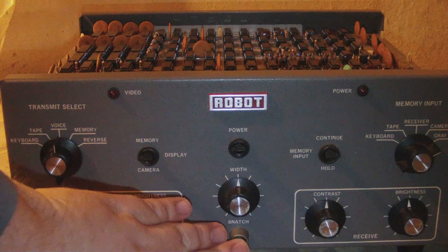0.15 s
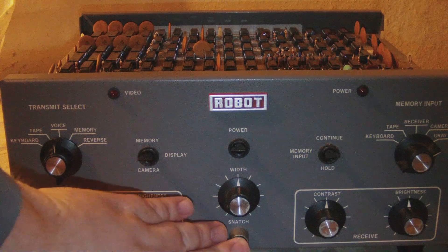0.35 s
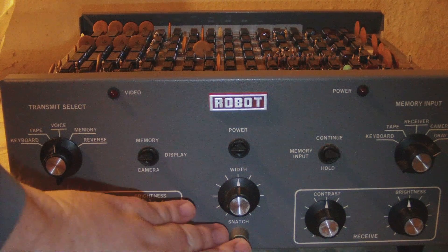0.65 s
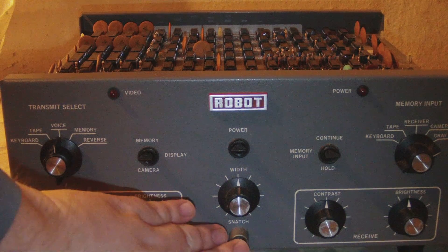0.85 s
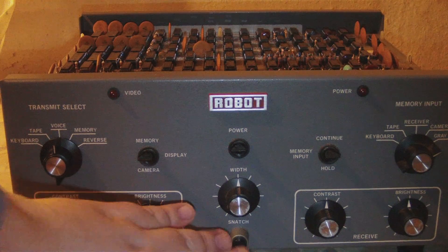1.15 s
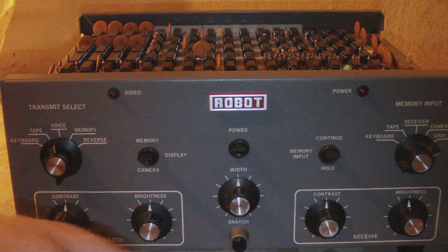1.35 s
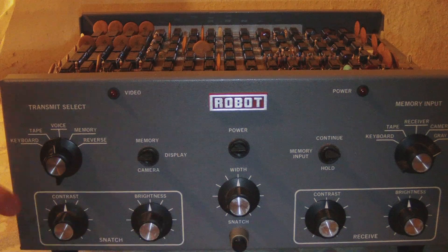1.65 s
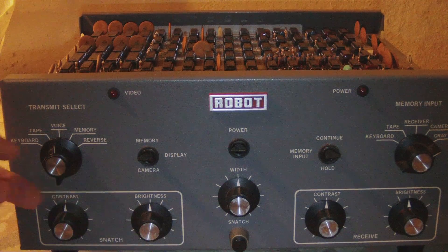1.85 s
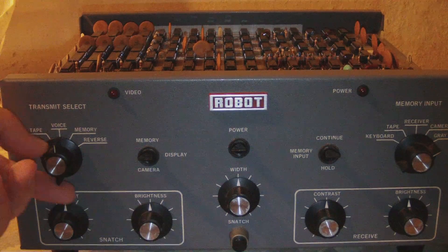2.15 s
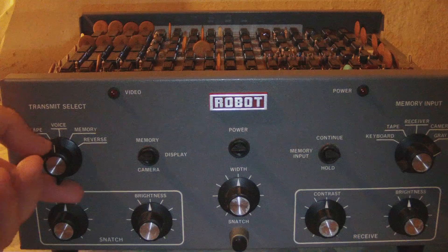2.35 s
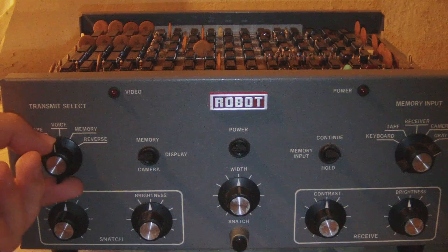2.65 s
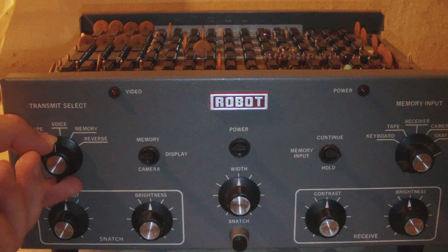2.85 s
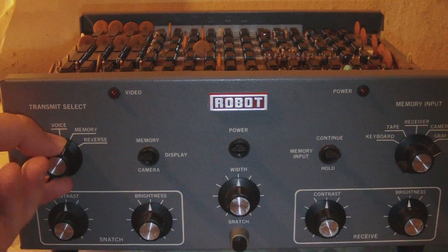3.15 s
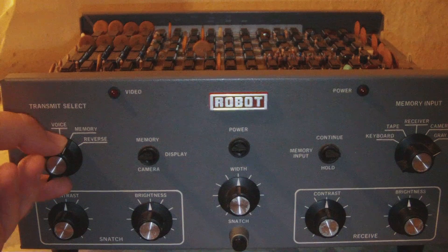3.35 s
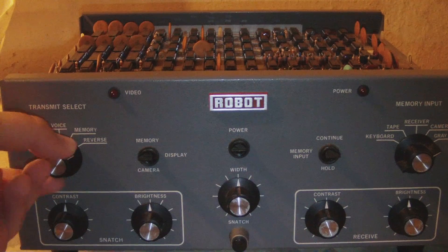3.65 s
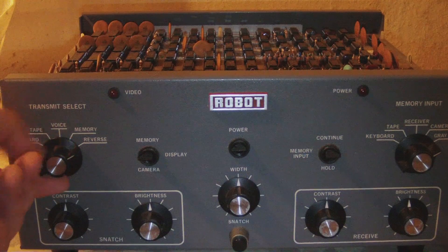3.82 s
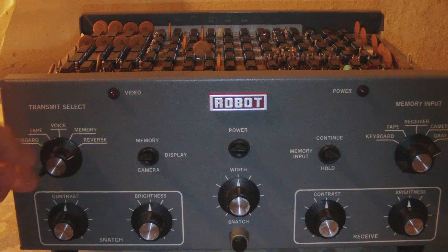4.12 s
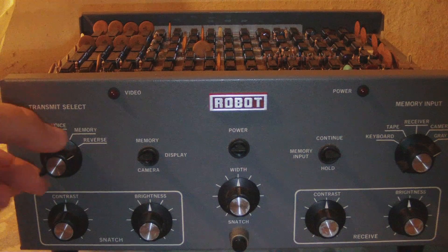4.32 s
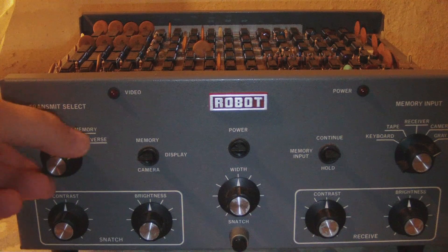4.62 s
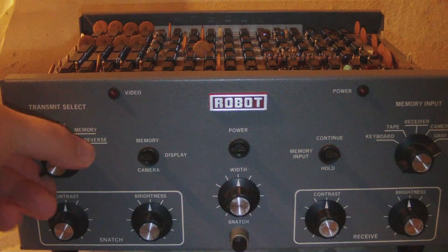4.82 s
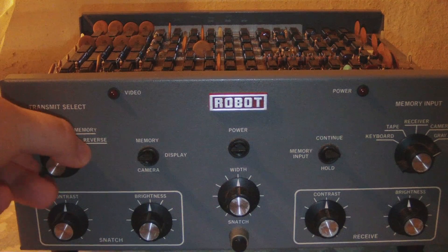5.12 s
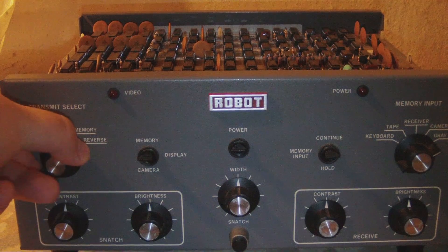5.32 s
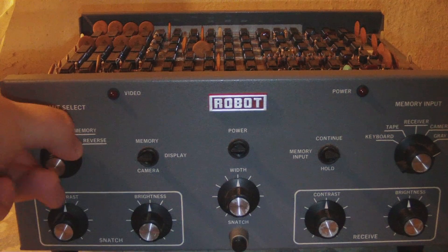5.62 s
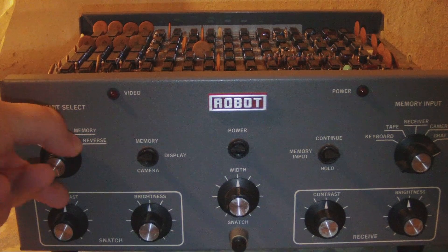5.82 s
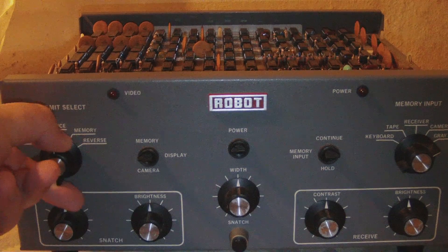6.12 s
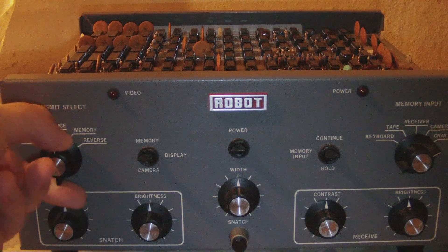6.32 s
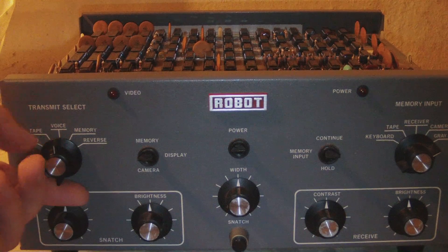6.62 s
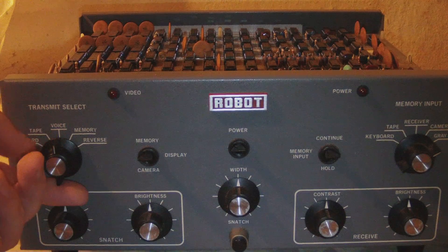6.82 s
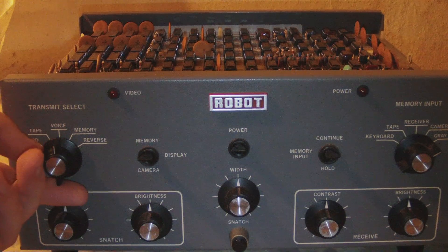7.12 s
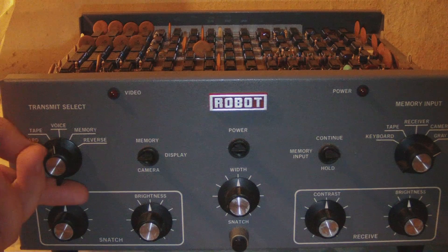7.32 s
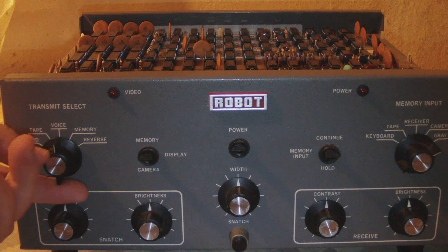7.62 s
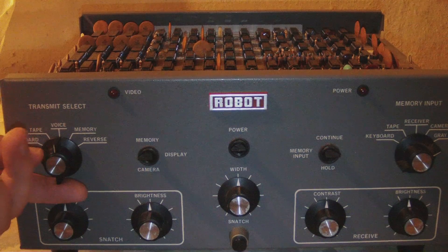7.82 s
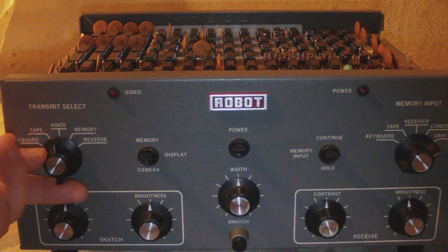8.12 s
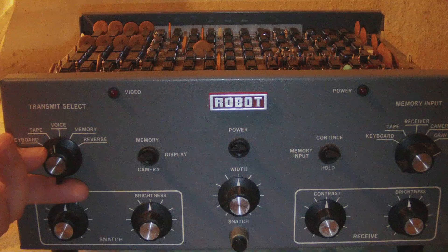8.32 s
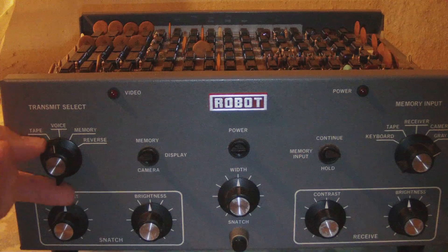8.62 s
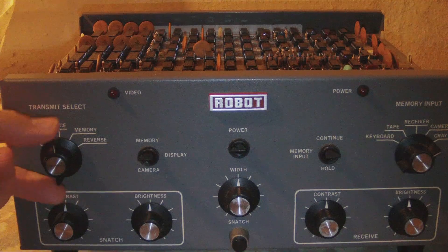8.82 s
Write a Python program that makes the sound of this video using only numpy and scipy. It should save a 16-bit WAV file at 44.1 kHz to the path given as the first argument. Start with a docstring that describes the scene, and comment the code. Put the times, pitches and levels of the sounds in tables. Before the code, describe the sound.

Fingers tick and brush lightly on a metal equipment panel, with one firmer tap. Then a rotary switch snaps twice in quick succession, sharp and metallic, with a brief ring. After a pause it clicks twice more, first softer, then loud. A few faint finger touches follow. A tiny lens motor ticks faintly around the first snap. The microphone is close, in a small quiet room with low rumble and hiss.

```python
"""Rotary selector on a metal panel

A hand works a rotary selector on a sheet-metal equipment panel, close by in a small quiet room.
Fingers tick and brush on the panel and knob. The detent snaps over, two steps up and later two
steps back, ringing the switch and the chassis. A small lens motor steps faintly beside the
microphone. Low rumble and microphone hiss lie underneath."""
import sys
import numpy as np
from scipy import signal
from scipy.fft import rfft, irfft
from scipy.io import wavfile

SR = 44100
rng = np.random.default_rng(int(sys.argv[2]) if len(sys.argv) > 2 else 0)


def inscribe(sig):
    """Save sig as 16-bit PCM at rate SR to the path in sys.argv[1].

    A 1-D sig is mono; a 2-D sig holds one channel per row.
    Samples are clipped to [-1, 1] before scaling.
    """
    pcm = np.round(np.clip(np.atleast_2d(sig).T, -1, 1) * 32767)
    wavfile.write(sys.argv[1], SR, pcm.astype(np.int16))


N = 395136
EVENT_SAMPLES = 16384
AGE_S = np.arange(EVENT_SAMPLES) / SR


def from_db(db):
    """Decibels to gain."""
    return 10 ** (np.asarray(db) / 20)


def unit_energy(x):
    """Scale to a mean energy of one per channel."""
    return x / np.sqrt(np.mean(np.sum(x ** 2, axis=-1)))


def add(track, start_s, sound):
    """Mix one event into a track."""
    start = round(start_s * SR)
    track[..., start:start + EVENT_SAMPLES] += sound[..., :N - start]


def coloured(x, curve):
    """Minimum-phase filter through (freq_hz, gain_db) points on a log-frequency axis."""
    size = x.shape[-1]
    freq_hz, gain_db = np.transpose(curve)
    bin_hz = np.maximum(np.fft.rfftfreq(size, 1 / SR), 1)
    bin_db = np.interp(np.log(bin_hz), np.log(freq_hz), gain_db)
    cepstrum = irfft(np.log(from_db(bin_db)))
    cepstrum[1:size // 2] *= 2
    cepstrum[size // 2 + 1:] = 0
    return irfft(rfft(x) * np.exp(rfft(cepstrum)), size)


# Stereo width of contact sounds: freq_hz, side_gain_db
CONTACT_WIDTH = [(100, -13.5), (1000, -4.5), (2200, -12.5), (4200, -4.5), (7000, -2), (14000, -5)]

def stereo(mid, side, width=CONTACT_WIDTH):
    """Left and right from mid and filtered side."""
    return mid + coloured(side, width) * np.array([[1], [-1]])


def panned(x, left_db):
    """Raise left over right by left_db."""
    return x * from_db(np.array([[left_db], [-left_db]]) / 2)


def ringing(modes, spread_db, spread_rad):
    """Struck modes: decaying sines, level varied per blow, phase per blow and channel."""
    pitch_hz, level_db, t60_s = np.transpose(modes)[:, :, None]
    struck_db = level_db + spread_db * rng.standard_normal(pitch_hz.shape)
    envelope = from_db(struck_db - 60 * AGE_S / t60_s)
    phase = spread_rad * rng.standard_normal((2, *pitch_hz.shape))
    return np.sum(envelope * np.sin(2 * np.pi * pitch_hz * AGE_S + phase), axis=1)


def burst(t60_s, rise_s):
    """Two independent flurries of tiny contacts, whitened so no pitch stands out."""
    envelope = from_db(-60 * AGE_S / t60_s) * (1 - np.exp(-AGE_S / rise_s))
    flurry = rng.standard_normal((2, EVENT_SAMPLES)) * envelope
    for _ in range(3):
        spectrum = rfft(flurry)
        flurry = irfft(spectrum / (np.abs(spectrum) + 1e-9)) * np.sqrt(envelope)
    return unit_energy(flurry)


# Room rumble and microphone hiss spectra: freq_hz, gain_db
RUMBLE_SPECTRUM = [(5, -23), (20, 1), (45, -9), (85, -13.5), (200, -17.5), (310, -19.5), (430, -18.5),
                   (600, -23), (1000, -29), (1400, -59)]
HISS_SPECTRUM = [(590, -30.5), (1000, -5), (1120, -1), (1330, -2.5), (1480, -1), (1600, -2), (1730, -3),
                 (2910, -3.5), (4240, -4), (4980, -5), (6630, -2), (9150, -9.5), (14600, -11.5),
                 (15500, -16.5)]
# Stereo width of the background: freq_hz, side_gain_db
BACKGROUND_WIDTH = [(60, -6.5), (130, -2.5), (290, -5.5), (640, -4.5), (1410, -3), (3100, -2.5), (6820, 1),
                    (15000, -1.5)]

def background(spectrum, level_db, left_db):
    """Steady coloured noise, slightly off centre."""
    noise = coloured(rng.standard_normal((2, N)), spectrum)
    mid, side = np.sqrt(N) * unit_energy(noise)
    return panned(from_db(level_db) * stereo(mid, side, BACKGROUND_WIDTH), left_db)


# Spans where the fingers shift their hold: start_s, end_s
GRIP_SHIFTS = [(0, 0.65), (2.96, 3.05)]

def grip_touches(rate_hz=3, level_db=-38, spread_db=1.5, treble_db=2):
    """Shifting fingers touch faintly at random; yields start_s, level_db, treble_db."""
    for start_s, end_s in GRIP_SHIFTS:
        for _ in range(int(np.ceil(rate_hz * (end_s - start_s)))):
            yield rng.uniform(start_s, end_s), level_db + spread_db * rng.standard_normal(), treble_db


# Light contacts of fingers and knob: start_s, level_db, treble_db
FINGER_TICKS = [(.1081, -14, -8), (.4345, -30.5, -15), (.4470, -25.5, -9), (.6133, -24, -10),
                (.8020, -34, -13), (1.0365, -27, -19), (1.0470, -28, -11), (1.2309, -1, -5),
                (2.9545, -31.5, -14.5), (6.4908, -31, 5), (6.6108, -35.5, -8), (8.6323, -29.5, 5)]
# Tick spectrum: freq_hz, gain_db
TICK_SPECTRUM = [(60, -25), (400, -19.5), (1100, -33), (2000, -20.5), (3100, -17.5), (3900, -2.5),
                 (4500, -1.5), (5300, -9.5), (6700, -7.5), (7600, -10), (10000, -18), (15000, -40.5)]

def finger_ticks(t60_s=0.0026, side_db=-7, firm_db=-13,
                 shiver_delay_s=0.0018, shiver_t60_s=0.027, shiver_db=-14):
    """Light contacts, damped at once by the hand; the panel shivers after each."""
    out = np.zeros((2, N))
    parts = [(0, t60_s, 0), (shiver_delay_s, shiver_t60_s, shiver_db)]
    for start_s, level_db, treble_db in [*FINGER_TICKS, *grip_touches()]:
        midrange_db = 0.44 * (firm_db - level_db)  # lighter ticks have more midrange
        tone = [(2600, midrange_db), (3800, 0), (4500, 0), (9000, treble_db)]
        for delay_s, part_t60_s, part_db in parts:
            mid, side = burst(part_t60_s, rise_s=0.0005)
            tick = coloured(stereo(mid, from_db(side_db) * side), TICK_SPECTRUM)
            tick = unit_energy(coloured(tick, tone))
            add(out, start_s + delay_s, from_db(level_db + part_db) * tick)
    return out


# Skin on panel and knob: centre_s, half_length_s, level_db, pitch_hz
SKIN_BRUSHES = [(.450, 0.015, -56, 4330), (1.044, 0.022, -51.5, 4360), (1.222, 0.038, -53, 4300),
                (3.861, 0.041, -60, 6500), (4.686, .008, -69, 5400), (4.950, 0.019, -64, 5800),
                (8.113, 0.086, -61.5, 7060)]

def skin_brushes(grain_db=6.5, skirt_db=-13):
    """Sliding skin: short swells of friction grains around one pitch."""
    out = np.zeros((2, N))
    peak_s = AGE_S.mean()
    for centre_s, half_length_s, level_db, pitch_hz in SKIN_BRUSHES:
        noise = rng.standard_normal((2, EVENT_SAMPLES))
        grains = noise * from_db(grain_db * rng.standard_normal(EVENT_SAMPLES))
        band = [(pitch_hz / 10, -24), (pitch_hz * 0.73, skirt_db), (pitch_hz, 0),
                (pitch_hz * 1.1, -9), (pitch_hz * 3, -28)]
        rub = np.sqrt(EVENT_SAMPLES) * unit_energy(coloured(stereo(*grains), band))
        swell = np.exp(-((AGE_S - peak_s) / half_length_s) ** 2)
        add(out, max(centre_s - peak_s, 0), from_db(level_db) * rub * swell)
    return out


# Lens motor moves: start_s, step_count, gentle_db
MOTOR_MOVES = [(2.1785, 1, -50), (2.7717, 5, -48), (3.1703, 9, -51)]

def lens_steps(period_s=0.0336, firm_steps=3, last_db=-43.5, rise_db=0.9):
    """Evenly clocked steps, long moves ending in firmer ones; yields start_s, level_db."""
    for start_s, step_count, gentle_db in MOTOR_MOVES:
        for step in range(round(step_count)):
            remaining = round(step_count) - 1 - step
            firm = remaining < firm_steps < step_count
            level_db = last_db - rise_db * remaining if firm else gentle_db
            yield start_s + step * period_s, level_db


# Lens barrel modes: pitch_hz, level_db, t60_s
BARREL_MODES = [(921, -8, 0.1), (1047, -6.5, 0.063), (2340, -13, 0.073), (2564, 2, 0.037),
                (2790, -3, 0.011), (3600, -7, 0.011), (4400, -16, .016), (5130, -5.5, 0.022),
                (5700, -16, 0.013), (6300, -6, 0.012), (7340, -5, 0.015)]
# Motor scrape spectrum: freq_hz, gain_db
SCRAPE_SPECTRUM = [(500, -17), (1000, 2), (1500, -9.5), (2500, 4), (3500, -1.5), (7500, -8), (11000, -34)]

def lens_motor(knock_db=-7, settle_s=0.0028, settle_db=-9, scrape_db=15, sharp_db=-45):
    """Each step knocks the barrel, scrapes briefly and settles with a softer knock."""
    out = np.zeros((2, N))
    for start_s, level_db in lens_steps():
        tone = [(2500, 0), (7000, level_db - sharp_db)]  # gentle steps are duller
        knocks = [(0, knock_db), (settle_s * rng.uniform(0.35, 1.2), settle_db)]
        for delay_s, part_db in knocks:
            knock = ringing(BARREL_MODES, spread_db=2.0, spread_rad=0.73)
            add(out, start_s + delay_s, from_db(level_db + part_db) * coloured(knock, tone))
        scrape = coloured(stereo(*burst(t60_s=0.029, rise_s=0.001)), SCRAPE_SPECTRUM)
        add(out, start_s, from_db(level_db + scrape_db) * coloured(unit_energy(scrape), tone))
    return out


# Metal-on-metal contact spectrum: freq_hz, gain_db
METAL_SPECTRUM = [(60, -31.5), (250, -24.5), (700, -22.5), (1300, -20.5), (2000, -14), (2850, -13.5),
                  (3200, -7), (4400, 0.5), (5600, -3), (6800, 1.5), (7700, -2), (8500, -10), (10700, -7),
                  (15000, -14)]

def ball_roll(rush_s=0.001, creep_s=0.005, creep_db=-21):
    """The detent ball creeps off its crest and speeds up: friction swelling to the end."""
    fade = np.exp(-AGE_S / rush_s) + from_db(creep_db) * np.exp(-AGE_S / creep_s)
    friction = coloured(stereo(*rng.standard_normal((2, EVENT_SAMPLES))), METAL_SPECTRUM)
    return unit_energy(friction * fade[::-1])


def metal_blow(level_db, tone, t60_s):
    """Metal hits metal: a bright, dying flurry of contacts."""
    flurry = coloured(stereo(*burst(t60_s, rise_s=0.00081)), METAL_SPECTRUM)
    return from_db(level_db) * coloured(unit_energy(flurry), tone)


def case_thump(pitch_hz=30, t60_s=0.027, rise_s=0.00069):
    """The case jolts on its feet and pushes one heavily damped swing of air."""
    envelope = from_db(-60 * AGE_S / t60_s) * (1 - np.exp(-AGE_S / rise_s))
    swing = np.cos(2 * np.pi * pitch_hz * AGE_S) * envelope
    highpass = signal.butter(1, 20, "high", fs=SR, output="sos")
    return panned(signal.sosfilt(highpass, swing), left_db=10)


# Detent snaps: start_s, level_db, reflection_delay_s, reflection_db,
# body_db, midrange_db, treble_db, thump_db
DETENT_SNAPS = [(3.069, 7, 0.0041, -5, -0.5, -9.5, -0.5, -35.5), (3.6046, 7, 0.0018, -3, -5, 3, 1.5, -31.5),
                (5.587, -5.5, 0.0034, -9, -10, 0.5, -0.5, -50),
                (6.2, 5.5, 0.0037, -6.5, -8, -12.5, -5, -51.5)]
# Modes of the spring and contacts, and of the chassis: pitch_hz, level_db, t60_s
SPRING_MODES = [(2973, -9.5, 0.063), (4410, 1, 0.031), (4420, -13, .13), (5152, -7.5, 0.078),
                (6374, -18, 0.04), (5872, 1.5, 0.075), (6500, -15, 0.04), (7000, -1, 0.064),
                (7105, -25, 0.07), (7330, -2.5, .045), (7700, -12.5, 0.07), (7886, -11.5, 0.1),
                (8520, -7, 0.086), (9500, -13, 0.12), (10750, -11, 0.077)]
SHEET_METAL_MODES = [(186, -14, 0.069), (258, -6.5, .25), (280, -6.5, 0.21), (293, -4, .18),
                     (318, -5.5, 0.088), (480.6, -9, 0.12), (558, 0, 0.06), (940, -7.5, .07),
                     (1170, -7.5, 0.051), (1443, -6.5, 0.065), (2056, -7, 0.034), (2580, 5.5, .04)]
# Thinner tone of early reflection and rattle: freq_hz, gain_db
REFLECTION_TONE = [(300, -3), (2500, -4.5), (4300, -10.5), (6600, 2), (8500, 0.5), (14000, -9)]

def detent(roll_db=-17, crack_db=4, rattle_db=-8, spring_db=-34, chassis_db=-43):
    """The ball slams into a notch; a nearby surface reflects the snap; contacts rattle, metal rings."""
    out = np.zeros((2, N))
    for (start_s, level_db, reflection_delay_s, reflection_db,
         body_db, midrange_db, treble_db, thump_db) in DETENT_SNAPS:
        tone = [(1500, midrange_db), (5500, 0), (7500, 0), (10000, treble_db)]
        reflection = panned(metal_blow(level_db + reflection_db, tone, t60_s=0.048), left_db=11.5)
        rattle = metal_blow(level_db + rattle_db, tone, t60_s=0.06)
        add(out, start_s - EVENT_SAMPLES / SR, from_db(level_db + roll_db) * ball_roll())
        add(out, start_s, metal_blow(level_db + crack_db, tone, t60_s=0.011))
        add(out, start_s + reflection_delay_s, coloured(reflection + rattle, REFLECTION_TONE))
        spring = ringing(SPRING_MODES, spread_db=2.0, spread_rad=0.92)
        chassis = ringing(SHEET_METAL_MODES, spread_db=6.5, spread_rad=0.3)
        add(out, start_s, from_db(level_db + spring_db) * coloured(spring, tone))
        add(out, start_s, from_db(chassis_db + body_db) * chassis)
        add(out, start_s, from_db(thump_db) * case_thump())
    return out


# Wall reflection spectrum: freq_hz, gain_db
WALL_SPECTRUM = [(60, -19), (280, 10.5), (900, 8), (2500, 5.5), (4300, -1.5), (6800, 2.5), (9000, 1.5),
                 (15000, -3.5)]

def room_tail(sound, t60_s=0.29, send_db=-12, side_db=-4):
    """Near walls return a dense, quickly dying tail."""
    mid, side = burst(t60_s, rise_s=0.0026)
    reflections = mid + from_db(side_db) * side * np.array([[1], [-1]])
    response = coloured(unit_energy(reflections), WALL_SPECTRUM)
    return from_db(send_db) * signal.fftconvolve(sound, response, axes=1)[:, :N]


def scene():
    """Hand and switch in the room, over rumble and hiss; the close lens motor stays dry."""
    panel = detent() + finger_ticks() + skin_brushes()
    rumble = background(RUMBLE_SPECTRUM, level_db=-63, left_db=0.35)
    hiss = background(HISS_SPECTRUM, level_db=-67.5, left_db=0.2)
    return panel + room_tail(panel) + lens_motor() + rumble + hiss


def record(dry):
    """Soft peak limiting, then a steep low-pass."""
    ceiling, cutoff_hz = 0.8, 15600
    rounded = ceiling * np.tanh(dry / ceiling)
    lowpass = signal.ellip(10, 0.1, 80, cutoff_hz, fs=SR, output="sos")
    return signal.sosfilt(lowpass, rounded)


dry = scene()
out = record(dry)
inscribe(out)
```